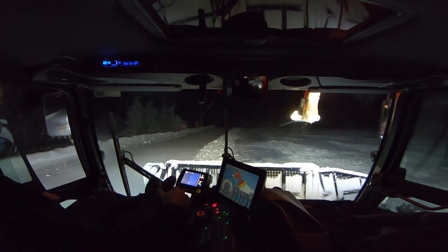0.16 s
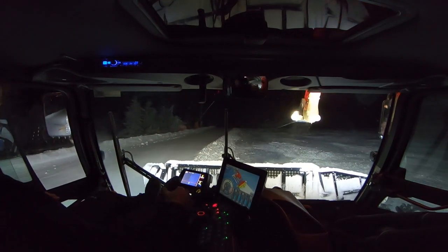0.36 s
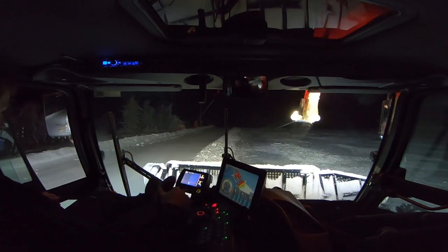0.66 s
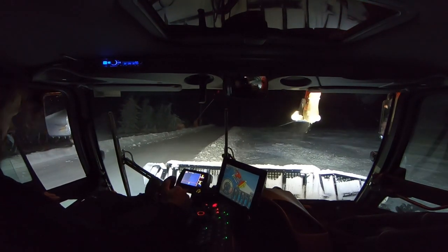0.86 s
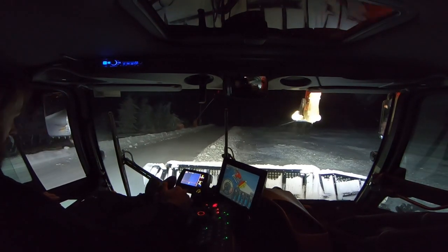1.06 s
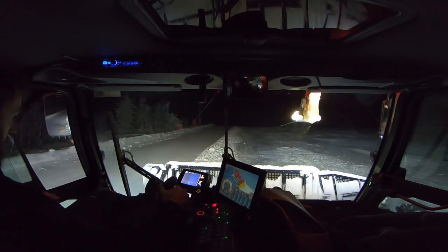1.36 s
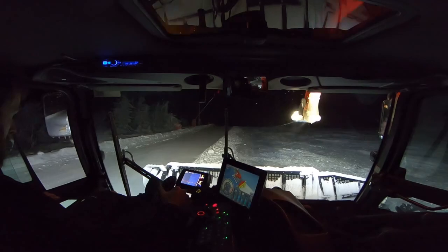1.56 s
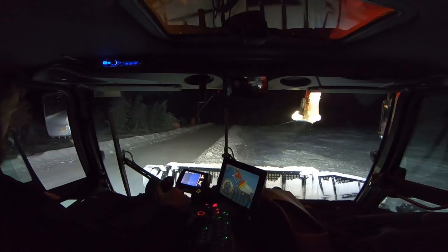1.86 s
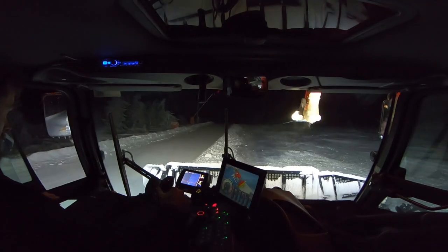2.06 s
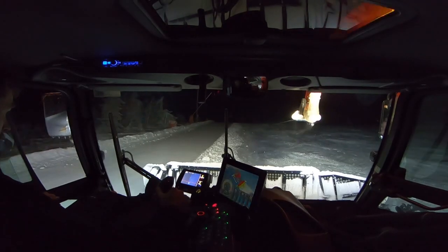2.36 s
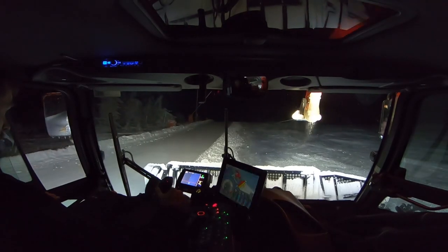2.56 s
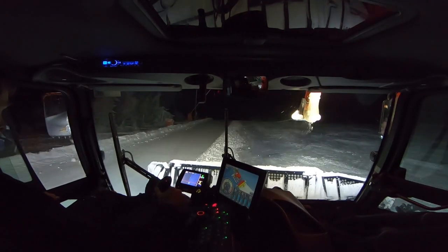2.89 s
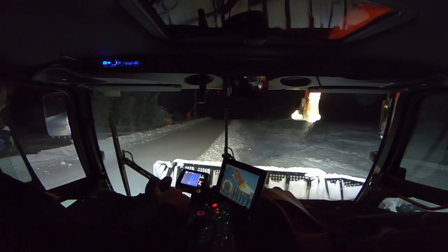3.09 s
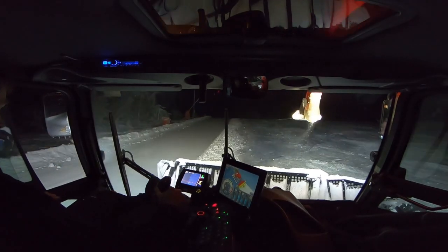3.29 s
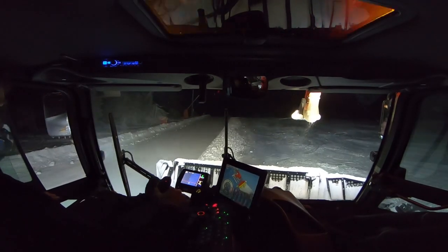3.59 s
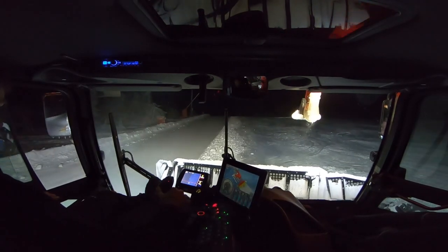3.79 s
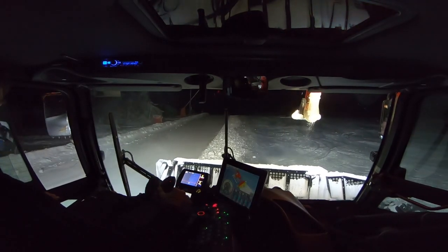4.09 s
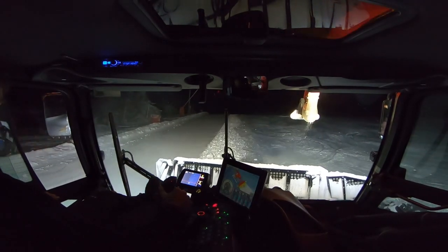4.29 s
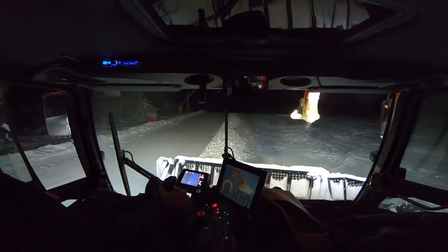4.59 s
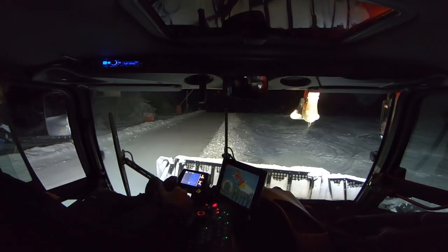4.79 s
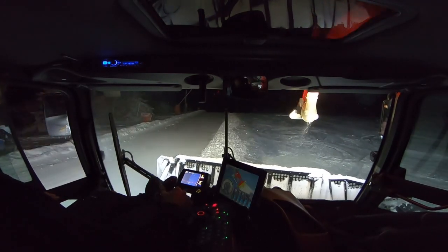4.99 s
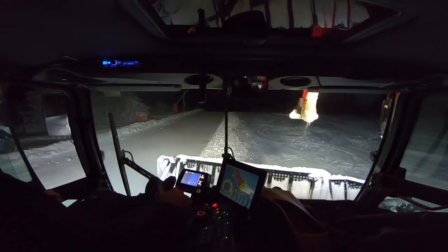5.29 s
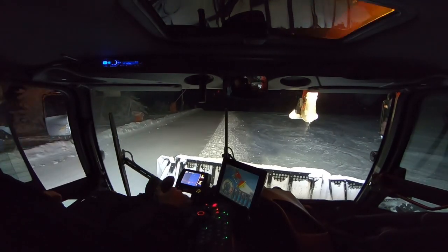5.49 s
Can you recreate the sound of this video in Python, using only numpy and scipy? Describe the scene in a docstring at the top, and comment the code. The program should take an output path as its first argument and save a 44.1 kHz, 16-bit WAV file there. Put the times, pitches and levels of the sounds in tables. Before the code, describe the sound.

A snow groomer runs under load for about five and a half seconds, heard from the driver's seat inside the cab. A deep, dense rumble of tracks grinding through snow continues throughout, with the muffled diesel droning behind the wall. Lumps of hard snow add soft, dull booms several times a second, and the shaking grows a little heavier around 1.8 and 4.4 seconds.

A low hum from the hydraulic pumps wavers over the rumble. Its pitch sinks slightly with the engine from about 0.5 to 2.2 seconds, climbs again between 3 and 4.2, dips near 5.1 and rises at the end. The hum swells and thins as it slides, briefly weakening around 1.5 and 3.3 seconds. A heater fan gives a softer, constant airy rush. Plastic trim ticks faintly near 1.9 seconds and twice around 2.8 to 2.9.

```python
"""A deep rumble and a wavering hum fill the cab of a snow groomer pushing snow at a steady pace.
The tracks shake the cab, and lumps of hard snow make it boom. The hum comes from two hydraulic
pumps: as the engine slows and recovers, their pitch slides through the cab's resonances (pitches
it boosts) and one dead spot. The six-cylinder diesel that turns them drones behind the wall,
the heater fan rushes, and the plastic trim ticks now and then."""
import sys
import numpy as np
from scipy import signal
from scipy.fft import rfft, irfft, next_fast_len
from scipy.io import wavfile
from scipy.ndimage import uniform_filter1d, minimum_filter1d

SR = 44100
rng = np.random.default_rng(int(sys.argv[2]) if len(sys.argv) > 2 else 0)


def output_pcm(signal):
    """Save a mono or channel-first signal as 16-bit PCM at the path in sys.argv[1].

    Samples are clipped to [-1, 1] before scaling.
    """
    pcm = np.clip(np.atleast_2d(signal).T, -1, 1) * 32767
    wavfile.write(sys.argv[1], SR, np.round(pcm).astype(np.int16))


N = 249165
TIME = np.arange(N) / SR

# how rough the ground is: time_s, roughness_db
GROUND_ROUGHNESS = [(0.1, -7.5), (0.7, -0.5), (1.75, 3.5), (2.55, -4.5), (3.1, 0), (4.4, 5), (5.1, -0.5),
                    (5.6, 0.5)]
# jolts from lumps of hard snow: peak_s, floor_boom_db, cabin_boom_db
SNOW_JOLTS = [(0.12, -36, -20), (0.33, -34, -20), (0.529, -28, -19), (0.66, -17, -35), (1.04, -22.5, -18),
              (1.26, -26, -20), (1.47, -18, -28), (1.63, -24, -20), (1.76, -18, -21), (1.95, -19.5, -30),
              (2.06, -32, -18), (2.37, -28, -17.5), (2.79, -28, -19.5), (3.03, -24.5, -19),
              (3.18, -30, -16), (3.34, -20, -19), (3.5, -32, -18.5), (3.74, -33.5, -18.5), (3.92, -20, -24),
              (4.08, -32, -18.5), (4.18, -22, -31.5), (4.3, -20, -39), (4.43, -21.5, -22), (4.61, -17, -23),
              (4.73, -33, -21.5), (5.18, -37, -18.5), (5.59, -18.5, -30)]
# the cab rocking on its mounts: pitch_hz, relative_db
SWAY_SPECTRUM = [(9, -30), (15, -7), (19.5, 0), (26, -6), (38, -6), (46, -13), (65, -30)]
# tracks and blade grinding through snow: pitch_hz, level_db_per_hz
GRIND_SPECTRUM = [(40, -48.5), (60, -45.5), (85, -44.5), (135, -47.5), (205, -42.5), (245, -46.5),
                  (300, -49), (345, -52.5), (365, -51.5), (400, -52), (440, -60), (490, -59.5),
                  (600, -62.5), (690, -68), (750, -75), (900, -74.5)]

# engine speed, sagging under load: time_s, speed_rpm
ENGINE_SPEED = [(0, 1332), (0.42, 1354), (0.72, 1324), (1.1, 1317), (1.6, 1311), (2.2, 1288), (2.42, 1290),
                (2.95, 1294), (3.5, 1328), (4.2, 1343), (4.7, 1332), (5.12, 1316), (5.42, 1340),
                (5.65, 1358)]
# load that makes the diesel and the drive pump louder: time_s, gain_db
DRIVE_EFFORT = [(0.1, .5), (1.0, 0), (2.4, 0), (3.5, .8), (4.65, -1.5), (5.5, -1.9)]
# load on the pump for the tiller, which churns the snow: time_s, gain_db
TILLER_EFFORT = [(0.1, 1.5), (1.15, 4), (1.6, 2), (2.0, -2), (2.8, -2), (3.8, 0), (4.6, -3), (5.3, 0.5)]
# cab resonances that boost each pump's hum and its octave: pitch_hz, width_hz, level_db
DRIVE_RING, DRIVE_OCTAVE_RING = (288, 28, -17.7), (565, 26, -34.3)
TILLER_RING, TILLER_OCTAVE_RING = (332.7, 18, -29), (655, 17, -45)
# weaker tones of the drive train: cycles_per_turn, level_db
DRIVE_WHINES = [(6, -43), (7.5, -37), (16.5, -50), (28.9, -56), (44.3, -58), (48, -58), (54, -62)]
# how hard each of the six cylinders fires: strength_db
CYLINDER_STRENGTHS = [1.2, -0.82, 0.22, -0.32, 1.7, -1.5]
# diesel clatter behind the cab wall: pitch_hz, level_db_per_hz
CLATTER_SPECTRUM = [(60, -53.5), (200, -52), (400, -58.5), (680, -65.5), (850, -72.5), (960, -69.5),
                    (1080, -75.5), (1330, -75.5), (1500, -89), (2400, -89), (3400, -82), (4400, -101.5),
                    (7000, -114)]

# the heater fan's rush: pitch_hz, level_db_per_hz
FAN_SPECTRUM = [(300, -92), (860, -75), (990, -64.5), (1100, -70), (1450, -73.5), (1900, -78),
                (3050, -81.5), (3550, -80), (4400, -91), (6500, -104), (7900, -103.5), (10000, -119),
                (12500, -126), (14000, -142)]
# narrow ringing of the vents, then two very faint, high electronic whines: pitch_hz, width_hz, level_db
THIN_TONES = [(935, 30, -54), (1140, 50, -55), (1335, 50, -56), (1555, 35, -61), (1970, 45, -65),
              (2330, 160, -63), (2725, 25, -69), (3265, 55, -63), (3350, 55, -63.5), (3520, 45, -64.5),
              (4085, 25, -74), (11032, 120, -86), (12966, 120, -96)]

# ticks of the trim: start_s, level_db
TRIM_TICKS = [(1.894, -58), (2.796, -48), (2.909, -64)]
# the bounces in each tick as the part settles: delay_s, gain_db
TICK_BOUNCES = [(0, -5), (.003, -1.5), (.008, -8)]
# the trim's ringing tones, each dropping 60 dB in its fade time: pitch_hz, fade_s, relative_db
TRIM_TONES = [(5200, .008, 3), (5850, .016, 0), (6500, .01, -1), (7650, .022, 1), (7950, .018, -5),
              (9200, .01, -7.5)]


def tracks(blows_per_s=420, grit=1.43):
    """Cleats and wheels strike packed snow; the cab sways and booms, more on rough ground and jolts."""
    def patter():
        blows = noise() * (rng.random(N) < blows_per_s / SR)
        return unit(unit(blows) + grit * noise())
    def shaking(level_db, follow_ground, flutter_db):
        return amp(level_db + follow_ground * roughness_db + flutter_db * wander(20))
    roughness_db = curve(GROUND_ROUGHNESS)
    floor_jolts, cabin_jolts = sum(np.outer(amp(booms_db), jolt(s)) for s, *booms_db in SNOW_JOLTS)
    sway = even_out(colour(patter(), SWAY_SPECTRUM), 0.027)
    sway *= shaking(-25, follow_ground=0.61, flutter_db=2.3)
    floor = even_out(resonate(patter(), pitch_hz=101, width_hz=26), 0.093)
    floor *= np.hypot(shaking(-26, follow_ground=0.55, flutter_db=1), floor_jolts)  # powers add
    cabin_air = even_out(resonate(patter(), pitch_hz=172.4, width_hz=42), 0.062)
    cabin_air *= np.hypot(shaking(-24, follow_ground=0.072, flutter_db=0.76), cabin_jolts)
    grind = colour(patter(), GRIND_SPECTRUM)
    return sway + floor + cabin_air + even_out(grind, 0.096) * np.std(grind)


def jolt(peak_s, rise_s=0.026, fall_s=0.03):
    """A lump of hard snow makes the shaking swell and fall quickly."""
    width_s = np.where(TIME < peak_s, rise_s, fall_s)
    return np.exp(-((TIME - peak_s) / width_s) ** 2 / 2)


def pumps(turns_per_s, turns, load_db, drive_strokes_per_turn=12.768, tiller_strokes_per_turn=14.781):
    """Piston strokes make two pumps hum over a faint drive-train whine; engine speed sets the pitch."""
    def tone(per_turn, gain, wobble):
        return np.sqrt(2) * gain * np.sin(2 * np.pi * (per_turn * turns + rng.random()) + wobble)
    def hum(per_turn, ring, tremble_db):
        gain = cab_resonance(per_turn * turns_per_s, *ring) * amp(tremble_db * wander(16))
        return tone(per_turn, gain, wobble=0.05 * wander(18))
    drive = hum(drive_strokes_per_turn, DRIVE_RING, tremble_db=0.5)
    drive *= dead_spot(drive_strokes_per_turn * turns_per_s)
    drive += hum(2 * drive_strokes_per_turn, DRIVE_OCTAVE_RING, tremble_db=0.5)
    tiller = hum(tiller_strokes_per_turn, TILLER_RING, tremble_db=0.6)
    tiller += hum(2 * tiller_strokes_per_turn, TILLER_OCTAVE_RING, tremble_db=0.6)
    whine = sum(tone(per_turn, amp(level_db + 2 * wander(2.1)), wobble=0.44 * wander(7.3))
                for per_turn, level_db in DRIVE_WHINES)
    return amp(load_db) * drive + amp(curve(TILLER_EFFORT)) * tiller + whine


def cab_resonance(pitch_hz, centre_hz, width_hz, level_db):
    """A tone grows louder as it nears a pitch at which the cab rings."""
    return amp(level_db) / np.hypot(1, 2 * (pitch_hz - centre_hz) / width_hz)


def dead_spot(pitch_hz, centre_hz=279.4, width_hz=7.5, depth_db=-24):
    """Near one pitch, a standing wave (echoes overlapping) almost cancels the hum at the seat."""
    offset = 2 * (pitch_hz - centre_hz) / width_hz
    return np.hypot(amp(depth_db), offset) / np.hypot(1, offset)


def diesel(turns, scatter_db=0.55, knock_s=0.011, fresh_noise=0.66):
    """The engine fires three times a turn; each cylinder has its own knock, never quite the same."""
    cylinders = len(CYLINDER_STRENGTHS)
    firings = np.flatnonzero(np.diff(np.floor(turns * cylinders / 2)))
    size = SR // 20
    fade = np.exp(-np.arange(size) / SR / knock_s)
    knocks = rng.standard_normal((cylinders, size))
    out = np.zeros(N + size)
    for k, start in enumerate(firings):
        strength = amp(CYLINDER_STRENGTHS[k % cylinders] + scatter_db * rng.standard_normal())
        knock = knocks[k % cylinders] + fresh_noise * rng.standard_normal(size)
        out[start:start + size] += strength * fade * knock
    return colour(unit(out[:N]), CLATTER_SPECTRUM)


def fan_and_electronics():
    """Air rushes from the ringing heater vents, beside two very faint, high electronic whines."""
    tones = sum(amp(level_db) * unit(resonate(noise(), pitch_hz, width_hz))
                for pitch_hz, width_hz, level_db in THIN_TONES)
    return colour(noise(), FAN_SPECTRUM) + tones


def trim_ticks(attack_s=0.0004):
    """Small plastic parts tick and chatter as the cab flexes."""
    taps = np.zeros(N)
    for start_s, level_db in TRIM_TICKS:
        for delay_s, gain_db in TICK_BOUNCES:
            taps[int((start_s + delay_s) * SR)] += amp(level_db + gain_db)
    t = TIME[:SR // 20]
    ring = sum(amp(db - 60 * t / fade_s) * np.sin(2 * np.pi * hz * t) for hz, fade_s, db in TRIM_TONES)
    ring *= 1 - np.exp(-t / attack_s)
    return signal.fftconvolve(taps, ring / np.abs(ring).max())[:N]  # every tap starts a ring


def amp(db):
    """Turn decibels into a number to multiply by."""
    return 10 ** (np.asarray(db) / 20)


def curve(table):
    """Join a table's points with straight lines in time."""
    return np.interp(TIME, *np.transpose(table))


def unit(x):
    """Scale to an average level (rms) of 1."""
    return x / np.sqrt(np.mean(x ** 2))


def noise():
    """White noise: a plain hiss."""
    return rng.standard_normal(N)


def colour(x, spectrum):
    """Shape a hiss's lows and highs to follow a table, falling away beyond both ends."""
    size = next_fast_len(N)
    hz, db = np.transpose(spectrum)
    bins_hz = np.maximum(np.fft.rfftfreq(size, 1 / SR), 1)
    roll_off = np.minimum(1, np.minimum(bins_hz / hz[0], hz[-1] / bins_hz)) ** 4
    gain = amp(np.interp(np.log(bins_hz), np.log(hz), db)) * roll_off * np.sqrt(SR / 2)
    return irfft(rfft(x, size) * gain, size)[:N]


def resonate(x, pitch_hz, width_hz):
    """Filter twice around one pitch, leaving a band about half of width_hz wide."""
    b, a = signal.iirpeak(pitch_hz, pitch_hz / width_hz / np.sqrt(1 / 2), fs=SR)
    return signal.lfilter(b, a, signal.lfilter(b, a, x))


def smooth(x, seconds):
    """Take a running average twice."""
    size = max(int(seconds * SR), 1)
    return uniform_filter1d(uniform_filter1d(x, size), size)


def even_out(x, seconds):
    """Hold the level near 1: slow swells go, quick flutter stays."""
    return x / np.sqrt(smooth(x ** 2, seconds) + 1e-18)


def wander(rate_hz):
    """A smooth random drift, about 1 in size."""
    return unit(smooth(noise(), 1 / rate_hz))


def scene():
    """Everything as it reaches the driver's seat, in one channel."""
    turns_per_s = curve(ENGINE_SPEED) / 60
    turns = np.cumsum(turns_per_s) / SR  # engine turns so far: keeps pumps and diesel in step
    load_db = curve(DRIVE_EFFORT)
    mix = tracks() + fan_and_electronics() + trim_ticks()
    mix += pumps(turns_per_s, turns, load_db)
    mix += amp(load_db) * diesel(turns)
    return mix[None]


def record(dry, ceiling_db=-4.6, reaction_s=0.006, top_hz=15000):
    """Ease down the loudest peaks and cut the highest treble."""
    allowed_gain = np.minimum(1, amp(ceiling_db) / (np.abs(dry[0]) + 1e-9))
    gain = smooth(minimum_filter1d(allowed_gain, 2 * int(reaction_s * SR) + 1), reaction_s)
    treble_cut = signal.ellip(8, 0.1, 70, top_hz, fs=SR, output="sos")
    return signal.sosfilt(treble_cut, dry * gain)


dry = scene()
out = record(dry)
output_pcm(out)
```